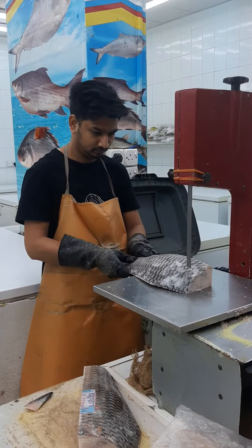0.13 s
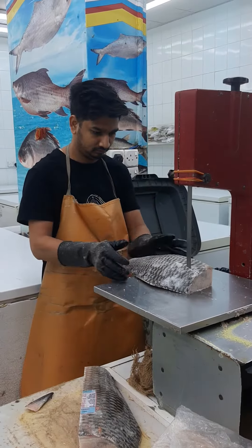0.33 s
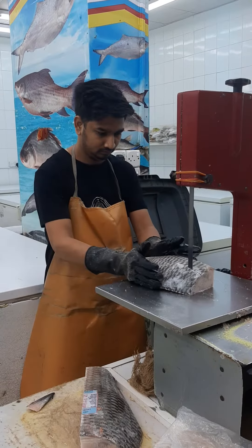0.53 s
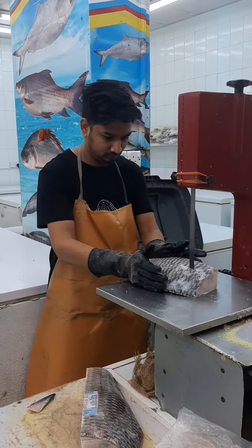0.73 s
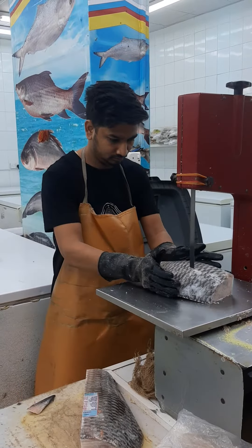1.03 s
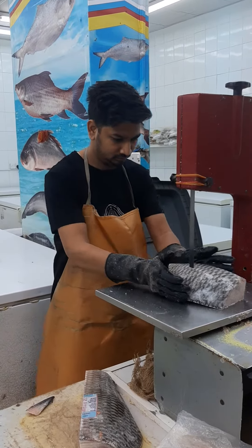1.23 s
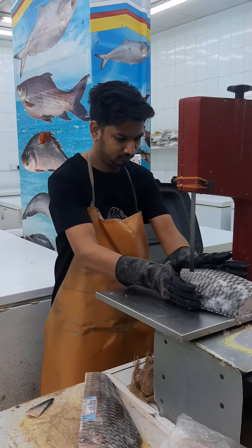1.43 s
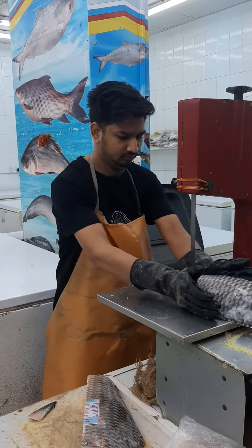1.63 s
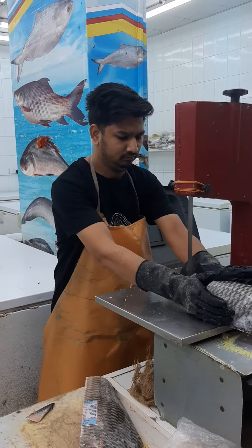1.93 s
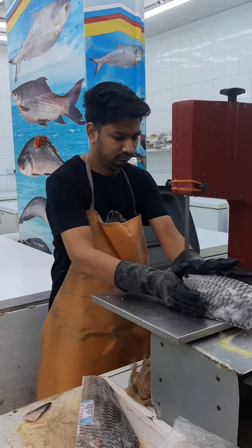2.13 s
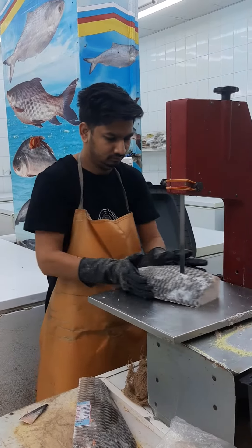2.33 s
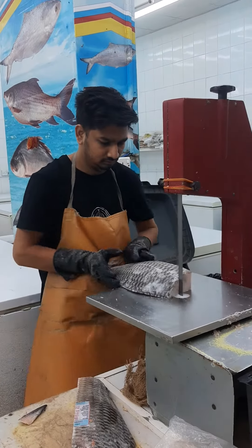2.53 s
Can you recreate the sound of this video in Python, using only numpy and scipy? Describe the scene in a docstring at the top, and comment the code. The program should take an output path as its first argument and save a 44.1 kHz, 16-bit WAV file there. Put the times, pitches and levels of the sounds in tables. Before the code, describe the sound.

A band saw hums throughout, near 285 Hz, swelling and fading differently at each ear, with blade rattle and hiss. From about 0.55 s the blade bites harder into a large fish, singing and whining over dense bone crackle as the pitch sags until 1.5 s, then recovers. A low drone rises near 1.65 s, a squeal at 1.9, a dull slide and brief squeaks at 2.3-2.5 s. Short tiled reflections.

```python
"""A band saw's hum, swelling and fading differently at each ear, opens in a tiled fish shop.
A large fish is pushed through the blade, which slows under load. One drive speed turns all tones.
Teeth whine, sing and hiss in the flesh: tones beat, filtered noise flickers. Random snaps with tile
reflections crackle as bone and scales. A low motor drone comes up late, then bone knots squeak
and the fish slides back over steel."""
import sys
import numpy as np
from scipy import signal
from scipy.fft import rfft, irfft
from scipy.io import wavfile

SR = 44100
rng = np.random.default_rng(int(sys.argv[2]) if len(sys.argv) > 2 else 0)


def master(y):
    """Save y as 16-bit WAV."""
    cut = np.clip(np.atleast_2d(y).T, -1, 1)
    pcm = np.round(cut * 32767)  # scale
    wavfile.write(sys.argv[1], SR, pcm.astype(np.int16))


N = 119070
T = np.arange(N) / SR
HZ = np.fft.rfftfreq(N, 1 / SR)


def amp(db):
    """Decibels to gain."""
    return 10 ** (np.asarray(db) / 20)


def unit(x):
    """Scales to rms 1, over both channels together."""
    return x / np.sqrt(np.mean(x ** 2) + 1e-20)


def curve(table):
    """Interpolates the columns of a time table at every sample."""
    s, *columns = np.transpose(table)
    return np.array([np.interp(T, s, c) for c in columns])


def spectrum(table):
    """Interpolates a frequency table at every bin, on a log axis."""
    f, value = np.transpose(table)
    return np.interp(np.log(HZ + 1), np.log(f), value)


def colour(x, table):
    """Filters by a dB spectrum, at rms 1."""
    return unit(irfft(rfft(x) * amp(spectrum(table)), N))


def wander(hz):
    """Smooth random signal from 2 Hz up to a soft corner, at rms 1."""
    lowpass = 1 / np.sqrt(1 + (HZ / hz) ** 4)
    return unit(irfft(rfft(rng.standard_normal(N)) * (HZ > 2) * lowpass, N))


def swell(s, length_s):
    """Gaussian rise and fall around one moment."""
    return np.exp(-((T - s) / length_s) ** 2)


# Left-right coherence of noise. Each row: frequency in Hz, likeness 0-1.
COHERENCE = [(50, 1), (250, 0.83), (500, 0.59), (1000, 0), (5000, 0.27), (15000, 0)]


def air():
    """White noise at two microphones, alike in the bass."""
    a, b = rfft(rng.standard_normal((2, N)))
    c = np.clip(spectrum(COHERENCE), -1, 1)
    return irfft(np.array([a, c * a + np.sqrt(1 - c ** 2) * b]), N)


# Drive speed. Each row: time in seconds, hum pitch in Hz.
DRIVE_HZ = [(0, 283.5), (.1, 283), (.3, 288), (.55, 288.3), (.68, 286.8), (.79, 283.5), (1.04, 282),
            (1.17, 279.6), (1.39, 279.4), (1.52, 275.8), (1.62, 279.8), (1.75, 281.6), (2.02, 290),
            (2.25, 287.6), (2.42, 288), (2.7, 291)]
FREE_HZ, SAG_HZ = 290, 11


def drive_hz():
    """Hum pitch at every sample, sagging as the fish loads the drive."""
    return curve(DRIVE_HZ)[0]


def load():
    """How far the drive is dragged below its free speed, 0-1."""
    return np.clip((FREE_HZ - drive_hz()) / SAG_HZ, 0, 1)


# Loudness of the hum. Each row: time in seconds, left rms in dB, right rms in dB.
HUM_DB = [(0, -20.5, -28), (.11, -22, -29.5), (.19, -19.5, -21), (.3, -23.5, -25), (.7, -21.5, -22.5),
          (.88, -20.5, -28), (1.03, -26, -43), (1.5, -27.5, -69), (1.55, -23, -30), (1.78, -23.5, -34.5),
          (1.87, -18.5, -20), (2.02, -22, -22), (2.15, -20, -20.5), (2.42, -20.5, -19.5), (2.57, -26, -23),
          (2.7, -25, -23.5)]
HUM_LAG_RAD = 0.64
FLUTTER, FLUTTER_HZ, FLUTTER_UNDER_LOAD = 0.03, 34.4, 3


def hum(turn):
    """Sine at the drive pitch, later in phase at the right; amplitude flutter grows with load."""
    lag = np.array([[0], [HUM_LAG_RAD]])
    flutter = 1 + FLUTTER * (1 + FLUTTER_UNDER_LOAD * load()) * wander(FLUTTER_HZ)
    return np.sqrt(2) * amp(curve(HUM_DB)) * flutter * np.cos(turn - lag)


LINE_WAVER = 0.26


def lines(turn, table):
    """Partials locked to the drive, wavering in amplitude and phase."""
    out = 0
    for multiple, db in table:
        waver = 1 + LINE_WAVER * wander(hz=3.4)
        phase = multiple * turn + 0.11 * wander(hz=2.3) + 2 * np.pi * rng.random()
        out = out + amp(db) * unit(waver * np.cos(phase))
    return out


# Weak wheel partials. Each row: multiple of the hum pitch, rms in dB.
WHEEL_LINES = [(.5, -54.5), (.9, -46.5), (1.098, -48.5), (1.5, -44), (3, -59)]
# Boom of the frame. Each row: frequency in Hz, relative density in dB.
FRAME_SPECTRUM = [(50, -38), (130, -36), (170, -20), (205, -4), (245, 4), (275, -1), (330, -10), (430, -5),
                  (520, -25), (900, -58)]
# Rattle of the running blade. Each row: frequency in Hz, relative density in dB.
RUNNING_SPECTRUM = [(200, -24), (520, -9), (700, 2.5), (1250, 0), (2150, -2), (2650, 7), (3500, 3.5),
                    (5000, -11), (6200, -22.5), (7300, -61), (9700, -56), (10600, -11.5), (15500, -4.5)]
FRAME_DB, RUNNING_DB = -37.5, -28.5
RATTLE_DB, RATTLE_HZ = 1.5, 90


def machine(turn):
    """Hum and wheel lines, plus filtered noise for the booming frame and rattling blade."""
    frame = amp(FRAME_DB) * colour(air(), FRAME_SPECTRUM)
    rattle = air() * amp(RATTLE_DB * wander(RATTLE_HZ))
    running = amp(RUNNING_DB) * colour(rattle, RUNNING_SPECTRUM)
    return hum(turn) + lines(turn, WHEEL_LINES) + frame + running


# Growl of the slowed drive. Each row: multiple of the hum pitch, rms at full load in dB.
STRAIN_LINES = [(1.24, -45), (2.25, -49.5), (2.48, -46.5), (2.75, -47.5), (3.39, -50), (5.02, -42.5)]


def strain(turn):
    """The machine growls as the load drags its speed down."""
    return load() * lines(turn, STRAIN_LINES)


TEETH_PER_HUM_CYCLE = 5.155
JITTER, JITTER_HZ = .0045, 80


def tooth_phase(turn):
    """Teeth strike at a rate set by the drive, with random jitter."""
    unsteady = 1 + JITTER * wander(JITTER_HZ)
    return TEETH_PER_HUM_CYCLE * np.cumsum(np.gradient(turn) * unsteady)


# How hard the teeth bite. Each row: time in seconds, bite in dB.
BITE_DB = [(0, 3.5), (.13, 1), (.33, -5.5), (.55, -4), (.565, 1), (1.3, 1), (1.65, 2.5), (1.93, 2),
           (2.03, -3), (2.1, 3), (2.35, 2), (2.48, 4.5), (2.58, -2.5), (2.7, -1)]
# Hiss of cut flesh. Each row: frequency in Hz, relative density in dB.
HISS_SPECTRUM = [(50, 5), (200, 10), (500, 10.5), (2000, -10), (2800, -14), (4200, 6.5), (6000, 9.5),
                 (7300, -5), (8300, -89), (9800, -13.5), (10500, 9), (13000, 2)]
HISS_DB, FLICKER_DB, FLICKER_HZ = -35, 2.5, 33.4  # level at 0 dB bite


def hiss():
    """Flickering filtered noise of teeth in flesh, following the bite."""
    flicker = amp(FLICKER_DB * wander(FLICKER_HZ))
    return amp(HISS_DB + curve(BITE_DB)[0]) * colour(air() * flicker, HISS_SPECTRUM)


BLADE_LAG_RAD = 1.5
WHINE_PULSE_DB, WHINE_PULSE_HZ = 1.9, 28


def beating(phase, depth, hz):
    """Blade tone with a shared pulse and separate random beating at each ear, at rms 1."""
    lag = np.array([[0], [BLADE_LAG_RAD]])
    sway = np.array([1 + depth * (wander(hz) + 1j * wander(hz)) for ear in range(2)])
    pulse = amp(WHINE_PULSE_DB * wander(WHINE_PULSE_HZ))
    return unit(pulse * (sway * np.exp(1j * (phase - lag))).real)


# Tooth-rate harmonics. Each row: multiple, level at 0 dB bite in dB, extra at full load in dB.
WHINE_HARMONICS = [(1, -40, -3), (3, -46, 6.5), (5, -55.5, 5), (8, -45, 3.5), (9, -43, 2), (10, -45.5, 4)]
WHINE_FOLLOW_LOW, WHINE_FOLLOW_HIGH = 1, 2.65  # dB per dB of bite, first to last harmonic
CHATTER, CHATTER_HZ = .85, 40.6


def whine(strike):
    """Tooth-rate harmonics; the higher ones follow the bite more steeply."""
    bite, out = curve(BITE_DB)[0], 0
    follows = np.linspace(WHINE_FOLLOW_LOW, WHINE_FOLLOW_HIGH, len(WHINE_HARMONICS))
    for (k, db, load_db), follow in zip(WHINE_HARMONICS, follows):
        level_db = db + follow * bite + load_db * load()
        out = out + amp(level_db) * beating(round(k) * strike, CHATTER, CHATTER_HZ)
    return out


# Singing blade. Each row: time in seconds, lower tone in dB, upper tone in dB.
SING_DB = [(0, -38, -43), (.3, -46, -55), (.54, -45, -52), (.57, -34.5, -39), (.7, -34, -40),
           (.81, -29, -31.5), (.97, -32.5, -39), (1.1, -32.5, -37), (1.38, -34.5, -39), (1.52, -33, -34),
           (1.68, -27.5, -34), (1.81, -32, -40), (1.92, -31.5, -40), (2.02, -46, -50), (2.13, -36, -43.5),
           (2.31, -39, -46), (2.39, -30, -43), (2.46, -36, -43), (2.6, -43, -50)]
SING_CHATTER, SING_CHATTER_HZ = .38, 30


def sing(strike):
    """The blade sings one and two octaves above the tooth rate."""
    out = 0
    for octave, db in enumerate(curve(SING_DB), 1):
        out = out + amp(db) * beating(2 ** octave * strike, SING_CHATTER, SING_CHATTER_HZ)
    return out


SQUEAL_AT_S, SQUEAL_S, SQUEAL_DB, SQUEAL_HARMONIC = 1.94, 0.094, -32, 9


def squeal(strike):
    """The blade squeals once on a high harmonic of the tooth rate."""
    tone = beating(SQUEAL_HARMONIC * strike, SING_CHATTER, SING_CHATTER_HZ)
    return amp(SQUEAL_DB) * swell(SQUEAL_AT_S, SQUEAL_S) * tone


def teeth(turn):
    """Teeth strike the fish: hiss, whine, singing and one squeal share a strike rate."""
    strike = tooth_phase(turn)
    return hiss() + whine(strike) + sing(strike) + squeal(strike)


ROOM_T60_S, ROOM_DB = 0.17, 11  # reflections relative to direct sound


def room(x):
    """Direct sound plus sparse decaying tile reflections, different at each microphone."""
    t = T[:SR // 2]
    tail = rng.standard_normal((2, len(t))) * (rng.random((2, len(t))) < .1)
    tail *= amp(-60 * t / ROOM_T60_S)
    tail *= amp(ROOM_DB) / np.linalg.norm(tail, axis=1, keepdims=True)
    tail[0, 0] = tail[1, 7] = 1  # direct sound, 7 samples later at the right
    # a mirrored lead-in fills the room before the start
    primed = np.concatenate([x[:len(t)][::-1], x])
    return signal.fftconvolve(primed[None], tail, axes=1)[:, len(t):len(t) + N]


# Crackle in bone and scales. Each row: time in seconds, gain in dB.
BONE_DB = [(0, -7), (.55, -7), (.59, -4), (.95, -7.5), (1.5, -6.5), (1.65, -1.5), (2.02, -8.5),
           (2.13, -0.5), (2.28, -3), (2.36, 2.5), (2.52, 0.5), (2.56, -2.5)]
# Colour of the crackle. Each row: frequency in Hz, relative density in dB.
CRACKLE_SPECTRUM = [(150, -55), (600, 0.5), (1100, -4), (2200, -2.5), (4500, 0.5), (6000, -12),
                    (7500, -36.5), (9800, -25), (10700, -25), (15500, -55)]
CRACKLE_DB, CRUNCH_DB, CRUNCH_HZ = -27.5, 1.66, 108
GRAINS_PER_S, GRAIN_SPREAD_DB = 1500, 3.5


def bone():
    """Dense small fractures: random snaps of either sign, reflected by the room."""
    hits = (rng.random(N) < GRAINS_PER_S / SR) * rng.choice([-1, 1], N)
    snaps = hits * amp(GRAIN_SPREAD_DB * np.minimum(rng.exponential(1, N), 4))
    crunch = room(snaps) * amp(CRUNCH_DB * wander(CRUNCH_HZ))
    return amp(CRACKLE_DB + curve(BONE_DB)) * colour(crunch, CRACKLE_SPECTRUM)


# Rise of the drone. Each row: time in seconds, gain in dB.
DRONE_DB = [(1.58, -11.5), (1.66, 1.5), (2.1, 3.5), (2.7, 4)]
# Motor partials. Each row: multiple of the hum pitch, level before the drone gain in dB.
MOTOR_LINES = [(.3, -57.5), (.407, -44), (.612, -50)]
# Motor rumble. Each row: frequency in Hz, relative density in dB.
RUMBLE_SPECTRUM = [(40, -20), (62, 13), (100, -4), (900, -87)]
RUMBLE_DB = -52  # before the drone gain


def drone(turn):
    """Low motor lines and filtered-noise rumble, rising late in the cut."""
    rumble = amp(RUMBLE_DB) * colour(air(), RUMBLE_SPECTRUM)
    return amp(curve(DRONE_DB)) * (lines(turn, MOTOR_LINES) + rumble)


THUD_AT_S, THUD_S, THUD_DB, THUD_HZ = 2.337, 0.1, -35.5, 463


def slide():
    """The fish is dragged back over the steel table: a swell of dull low-passed noise."""
    dull = unit(irfft(rfft(air()) / (1 + (HZ / THUD_HZ) ** 4), N))
    return amp(THUD_DB) * swell(THUD_AT_S, THUD_S) * dull


# Harder knots of bone. Each row: time in seconds, burst level in dB, ring in Hz.
KNOTS = [(2.338, -30, 4350), (2.356, -25, 4450), (2.366, -26, 3050), (2.398, -20, 3080),
         (2.414, -25.5, 3150), (2.502, -27.5, 3300), (2.528, -27, 3150)]
KNOT_WIDTH_HZ, KNOT_S = 420, .0055


def knot(s, db, hz):
    """A hard knot makes the blade squeak briefly: a burst of resonant noise."""
    ring = irfft(rfft(air()) / (1 + 2j * (HZ - hz) / KNOT_WIDTH_HZ) ** 2, N)
    burst = swell(s, KNOT_S)
    return amp(db) * unit(ring * burst) * np.sqrt(np.mean(burst ** 2))


def scene():
    """One drive speed turns the hum, the growl, the teeth and the drone."""
    turn = 2 * np.pi * np.cumsum(drive_hz()) / SR
    knots = sum(knot(*row) for row in KNOTS)
    return machine(turn) + strain(turn) + teeth(turn) + bone() + drone(turn) + slide() + knots


# Tilt toward the left. Each row: frequency in Hz, left minus right in dB.
LEAN_DB = [(300, -1), (1200, 0.9), (2800, -3), (5000, 1), (11000, 0), (13500, -1.5)]
MIC_LOW_HZ, CUTOFF_HZ = 46, 15850


def record(dry):
    """Left-right tilt and bass cut of the two microphones, then the band limit."""
    tilt_db = spectrum(LEAN_DB) * np.array([[.5], [-.5]])
    heard = irfft(rfft(dry) * amp(tilt_db), N)
    bass_cut = signal.butter(4, MIC_LOW_HZ, "high", fs=SR, output="sos")
    heard = signal.sosfilt(bass_cut, heard)
    band_limit = signal.firwin(511, CUTOFF_HZ, window=("kaiser", 9), fs=SR)
    return signal.oaconvolve(heard, band_limit[None], "same")


dry = scene()
out = record(dry)
master(out)
```